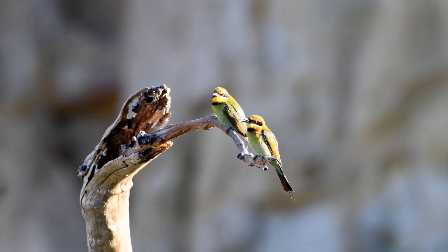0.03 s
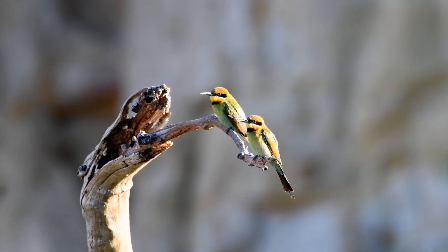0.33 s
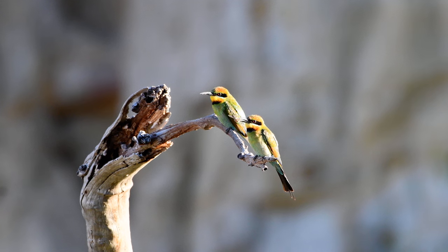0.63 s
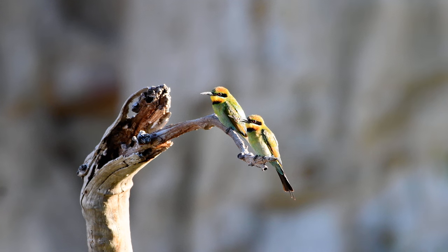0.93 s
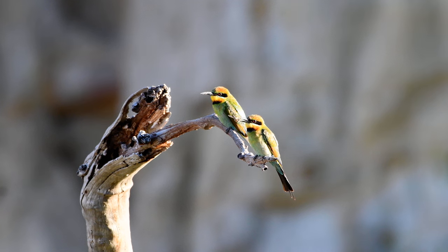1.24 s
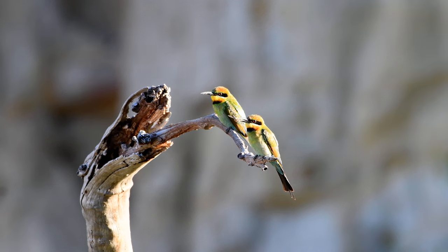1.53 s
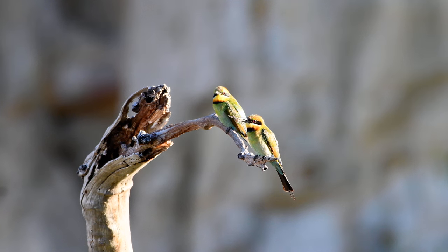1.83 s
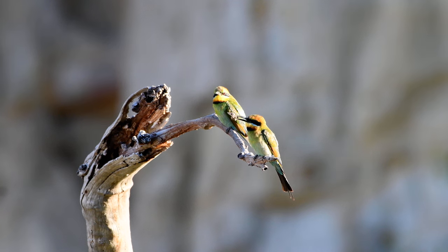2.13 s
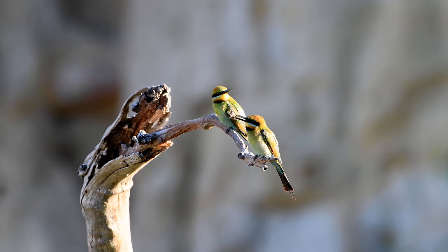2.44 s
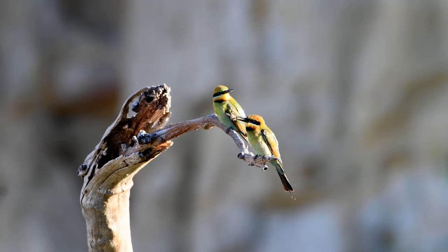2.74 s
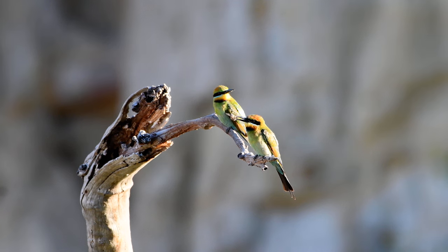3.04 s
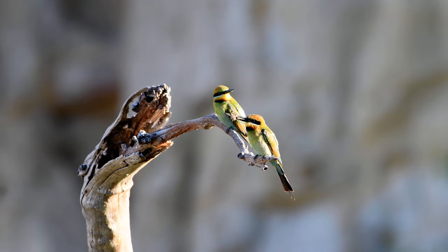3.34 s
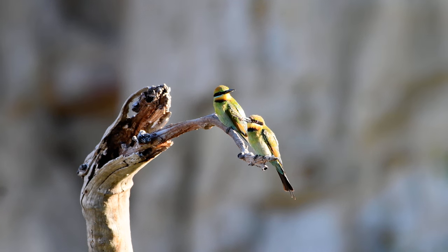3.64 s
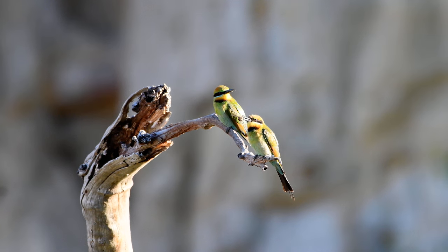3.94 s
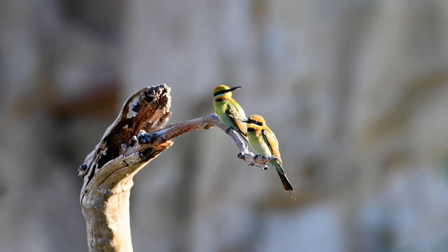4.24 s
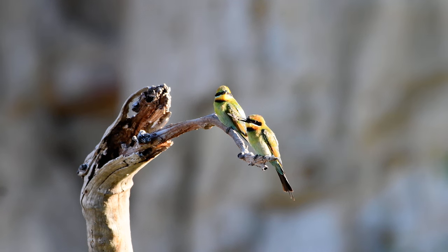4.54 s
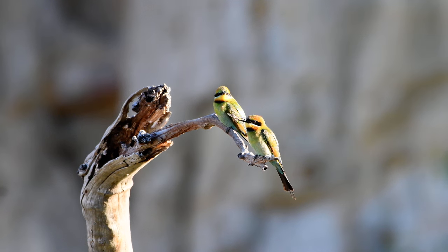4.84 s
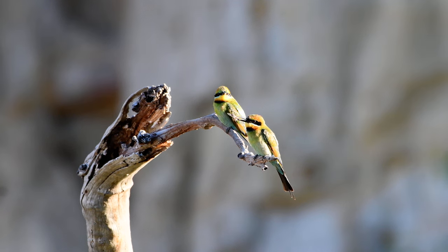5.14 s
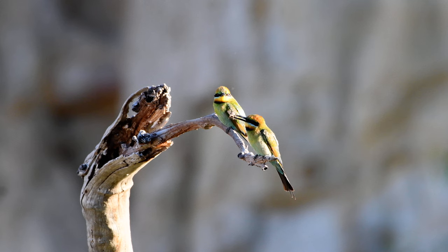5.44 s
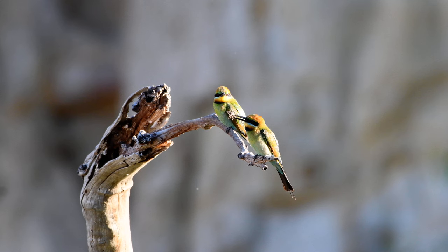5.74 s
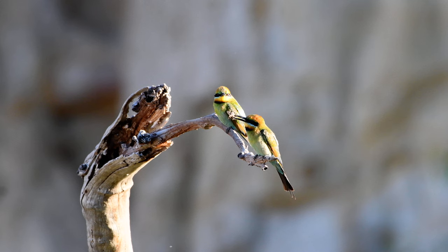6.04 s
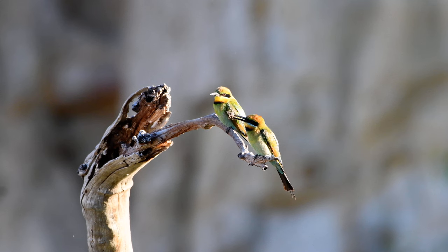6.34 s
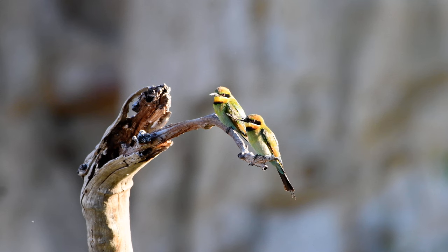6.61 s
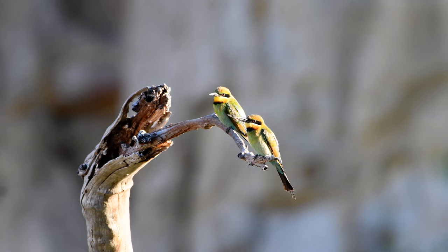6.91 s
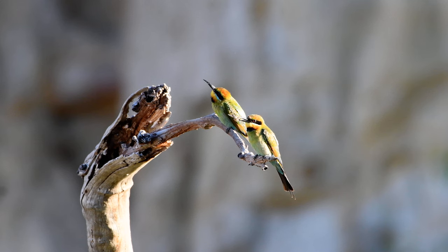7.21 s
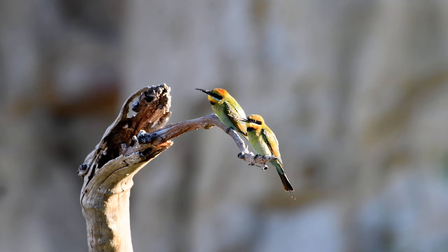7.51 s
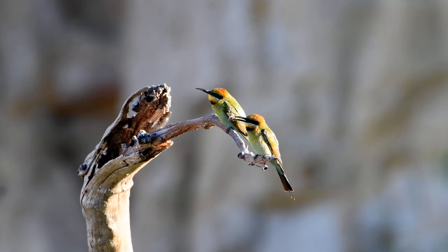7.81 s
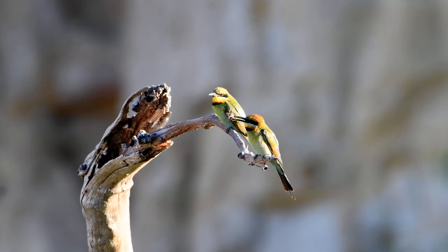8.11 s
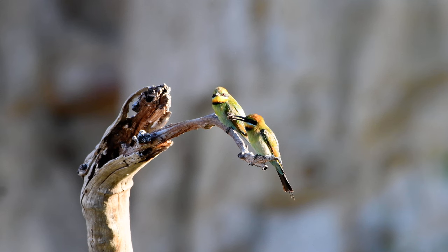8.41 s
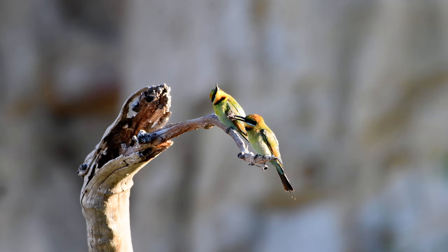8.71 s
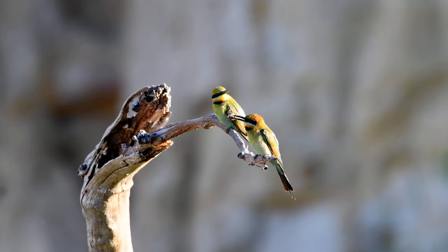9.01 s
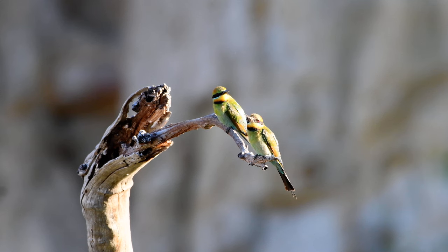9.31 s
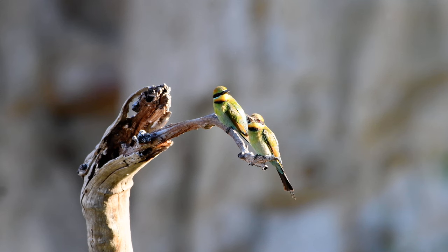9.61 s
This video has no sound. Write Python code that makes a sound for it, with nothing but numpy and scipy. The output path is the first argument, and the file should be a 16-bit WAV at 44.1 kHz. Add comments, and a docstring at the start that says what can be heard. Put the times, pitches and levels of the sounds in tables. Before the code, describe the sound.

Faint insect hiss and a low distant rumble run throughout this lightly echoing outdoor scene. From 0.2 to 2.4 seconds, a close songbird slightly to the right sings a dense run of very high chitters and swooping notes. A bird on the left gives short, buzzy falling calls at about 0.2, 2.2, 3.2, 3.6, 4.3, 4.6, 5.1, 6.8, 7.8 and 8.8 seconds. One soft, damped knock sounds nearby at 1.7 seconds. Quiet runs of pips come near 0.6 and 3.8 seconds. Distant hoarse caws sound on the right around 1 and 4 seconds, and more faintly near 7.5 and 9. Thin, high trills appear on the right near 2.7, 4.9, 7.2 and 8.4 seconds. Soft low warbles, far whistles and scratchy calls are scattered between. Crisp chips come around 2 and 7 seconds, then cluster from 8.7 to 9.5.

```python
"""Birds in a rocky gully

A near songbird on the right opens with chitters, dives and arches; a buzzy caller on the left repeats a
falling call. Chips, pips, whistles, trills, warbles, scratchy calls and caws come from other birds.
Each voice is a vibrating syrinx membrane, a tone modulated in pitch and level, echoed by trees and rock.
Insects hiss steadily over a low distant rumble, and one soft, damped knock sounds close by."""
import sys
import numpy as np
from scipy import signal
from scipy.fft import rfft, irfft, next_fast_len
from scipy.io import wavfile

SR = 44100
rng = np.random.default_rng(int(sys.argv[2]) if len(sys.argv) > 2 else 0)


def to_wav(s):
    """Save 16-bit WAV."""
    ch = np.atleast_2d(s).T  # columns
    pcm = np.round(np.clip(ch, -1, 1) * 32767)  # PCM
    wavfile.write(sys.argv[1], SR, pcm.astype(np.int16))


N = 430416
T = np.arange(N) / SR
EARS = np.array([[1], [-1]])  # left, right


def undb(db):
    """Amplitude ratio of a level in decibels."""
    return 10 ** (np.asarray(db) / 20)


def unit(x):
    """Normalisation to an rms of 1."""
    return x / np.sqrt(np.mean(x ** 2) + 1e-20)


def add(track, start, x):
    """Superposition: a sound joins a track at a time in seconds."""
    i = max(int(start * SR), 0)
    track[i:i + len(x)] += x[:max(N - i, 0)]


def wander(n, rate):
    """Random modulation: lines join `rate` Gaussian values a second, with a spread near 1."""
    at = np.arange(n) * rate / SR
    points = rng.standard_normal(int(at[-1]) + 2)
    return np.sqrt(3 / 2) * np.interp(at, np.arange(len(points)), points)


def colour(x, points):
    """Zero-phase filtering by a curve of (frequency_hz, gain_db) points."""
    hz, db = np.transpose(points)
    size = next_fast_len(N)
    f = np.maximum(np.fft.rfftfreq(size, 1 / SR), 1)
    return irfft(rfft(x, size) * undb(np.interp(np.log(f), np.log(hz), db)), size)[..., :N]


def course(length):
    """Normalised time, 0 to 1 through a note."""
    return np.linspace(0, 1, int(max(length, .004) * SR))


def arch(length, first, middle, last):
    """A parabolic contour through three pitches."""
    return np.polyval(np.polyfit([0, .5, 1], [first, middle, last], 2), course(length))


def syrinx(hz, edge, rough, harmonics_db=(0,)):
    """Frequency modulation: membrane flutter roughens a tone, tapered over the share `edge` of it."""
    flutter = 1 + rough * wander(len(hz), 900)
    phase = 2 * np.pi * np.cumsum(hz * flutter) / SR
    tone = sum(undb(db) * np.sin(k * phase) * (k * hz < SR / 2) for k, db in enumerate(harmonics_db, 1))
    return np.sqrt(2) * tone * signal.windows.tukey(len(hz), np.clip(edge, 0, 1))


def place(x, pan_db, lag_ms, scatter_db, scatter_t60, tail_db, tail_t60=1.9, off_axis_db=0):
    """Multipath propagation: direct sound, quick scatter from branches and reverberation from rock."""
    t, size = T[:SR], next_fast_len(N)
    scatter = undb(-60 * t / scatter_t60) * (t > .002) * rng.standard_normal((2, SR))
    tail = undb(-60 * t / tail_t60) * (1 - np.exp(-t / .015)) * rng.standard_normal((2, SR))
    echoes = (undb(scatter_db) * unit(scatter) + undb(tail_db) * unit(tail)) / np.sqrt(SR)
    gain = unit(undb(EARS * pan_db / 2))  # positive pan and lag put the bird on the left
    lead = np.exp(1j * np.pi * EARS * np.fft.rfftfreq(size, 1 / SR) * lag_ms / 1000)
    # the highest notes are beamed, so off the beak's axis they arrive mostly as echo
    beamed = colour(x, [(7200, .0057), (9500, off_axis_db)])
    direct = irfft(rfft(beamed, size) * lead, size)[:, :N]
    return gain * direct + np.sqrt(gain) * signal.fftconvolve(x[None], echoes, axes=1)[:, :N]


def diffuse_noise(spectrum):
    """Interaural coherence: noise is alike at both ears in the bass, largely unrelated in the treble."""
    # stereo width: frequency_hz, side_minus_mid_db
    width = [(40, -11), (90, -51), (180, -47), (350, -18.5), (700, -7.5), (1400, 0), (4000, 3.5),
             (6000, -2), (12000, 0.5)]
    hz, side_db = np.transpose(width)
    mid_db = -10 * np.log10(1 + undb(side_db) ** 2)
    mid, side = rng.standard_normal((2, N))
    mid = colour(mid, np.c_[hz, mid_db])
    side = colour(side, np.c_[hz, mid_db + side_db])
    both = colour(np.array([mid + side, mid - side]), spectrum)
    return both / np.std(both.mean(axis=0))


def insects(level_db=-51, pan_db=2, flicker_db=1.62):
    """Amplitude modulation: four bands of insect hiss flicker independently, a little to the left."""
    # hiss spectrum: frequency_hz, relative_density_db
    spectrum = [(1760, -28), (3000, -18), (3260, -10.5), (3750, -6), (4400, -0.5), (4750, 0), (5810, 1),
                (6310, 1), (6760, -1.5), (7880, -10), (9310, -19.5), (15000, -23.5), (15800, -27)]
    hiss = undb(level_db) * diffuse_noise(spectrum)
    for band_hz in ((3800, 5000), (5000, 6000), (6000, 7000), (7000, 8500)):
        band = signal.sosfiltfilt(signal.butter(2, band_hz, "band", fs=SR, output="sos"), hiss)
        drift_db = .6 * wander(N, 3)
        gain_db = flicker_db * wander(N, 22) + drift_db + EARS * pan_db / 2
        hiss = hiss + (undb(gain_db) - 1) * band
    return hiss


def distant_rumble(level_db=-58.5, drone_hz=94, drone_db=-67):
    """A tone in noise: a low drone wavers in pitch and level within a gently swelling rumble."""
    # rumble spectrum: frequency_hz, relative_density_db
    spectrum = [(13, -62), (22, -40), (51, -8), (93, -4), (107, -3.5), (124, -6.5), (216, -7.5),
                (339, -15.5), (462, -14), (522, -15.5), (567, -16.5), (1240, -16.5), (1830, -17),
                (2200, -18.5), (3000, -17), (3900, -49), (6600, -120)]
    rumble = undb(level_db + .4 * wander(N, 2)) * diffuse_noise(spectrum)
    drone_gain = undb(drone_db + 3.1 * wander(N, 9))
    phase = 2 * np.pi * np.cumsum(drone_hz + 6 * wander(N, 20)) / SR
    return rumble + drone_gain * np.sqrt(2) * np.sin(phase)


def far_chorus(count=45, level_db=-68):
    """A random point process: faint chirps from far down the gully, spread over an octave."""
    out = np.zeros(N)
    for when, duration, octave, bend, slope, loud in rng.random((count, 6)):
        tilt = slope - .3
        contour = arch(.0203 + .0345 * duration, 1 + .285 * tilt, 1 + .142 * (bend - .5), 1 - .24 * tilt)
        chirp = syrinx(2200 * 2 ** octave * contour, edge=.54, rough=.0092)
        add(out, when * N / SR, undb(level_db + 3.8 * (loud + octave - .5)) * chirp)
    return place(out, pan_db=-10, lag_ms=0, scatter_db=-3, scatter_t60=.15, tail_db=-17)


def knock(start_s=1.6825, pulse_hz=410, ring_hz=290, rise_s=.0036, ring_t60=.096, level_db=-33):
    """Damped vibration: a soft pulse and a brief ring, the same in both ears."""
    out, t = np.zeros(N), T[:SR // 10]
    swell = (t / rise_s * np.exp(1 - t / rise_s)) ** 3
    pulse = swell * np.cos(2 * np.pi * pulse_hz * (t - rise_s))
    decay = .21 * undb(-60 * t / ring_t60) * (1 - np.exp(-t / rise_s))
    add(out, start_s, undb(level_db) * (pulse + decay * np.sin(2 * np.pi * ring_hz * t)))
    return out


def cawer():
    """A harmonic series, strongest on its second partial, made hoarse by deep pitch jitter."""
    # distant caws: start_s, length_s, from_hz, to_hz, roughness_share, level_db
    caws = [(.83, .25, 1110, 965, 0.082, -50), (1.02, 0.19, 1080, 1300, .16, -49.5),
            (1.488, .4, 1077, 1140, 0.19, -55), (3.809, .58, 1400, 1052, 0.076, -51.5),
            (7.545, .15, 1385, 1055, .13, -64), (8.927, 0.6, 1172, 1094, .1, -63)]
    out = np.zeros(N)
    for start, length, first, last, rough, db in caws:
        path = first + (last - first) * course(length)
        gain = undb(db + 2 * wander(len(path), 60))
        add(out, start, gain * syrinx(path, edge=.45, rough=rough, harmonics_db=[-11, .5, -10.5]))
    return place(out, pan_db=-9, lag_ms=-.2, scatter_db=-8.5, scatter_t60=.14, tail_db=-12.5)


def triller(note_s=.042):
    """Pulse trains: runs of thin falling notes swell early and fade, blurred by scattering."""
    # high trills: start_s, length_s, notes_per_s, top_hz, fall_share, level_db
    trills = [(2.732, .37, 14.8, 8490, 0.088, -48.5), (4.886, 0.46, 16.4, 8660, 0.093, -54),
              (6.412, 0.09, 18, 8600, 0.16, -51), (7.244, 0.27, 18, 8620, 0.176, -47),
              (8.357, 0.31, 16, 8700, 0.11, -55)]
    out = np.zeros(N)
    for start, length, rate, top, fall, db in trills:
        path = top * (1 - fall * course(note_s))
        for after in np.arange(0, length - .02, 1 / rate):
            swell_db = -20 * abs(after / length - .3)
            add(out, start + after, undb(db + swell_db) * syrinx(path, edge=.8, rough=.016))
    return place(out, pan_db=-12, lag_ms=-.17, scatter_db=2, scatter_t60=.22, tail_db=-5, tail_t60=.7)


def warbler():
    """Transposition: a soft four-note phrase returns at varying pitch and speed."""
    # low phrases: start_s, spacing_ratio, pitch_ratio, level_db
    phrases = [(2.212, 0.35, 1.01, -58), (2.672, 1.3, 1.03, -57.5), (3.386, 0.96, .97, -58.5),
               (4.548, .95, 1, -57.5), (5.243, 0.98, 0.95, -59), (5.900, 1.06, 0.98, -59),
               (6.757, 0.77, .96, -62.5), (7.817, 1.13, .98, -59.5), (8.375, 1.24, 1.01, -58)]
    # notes of a phrase: offset_s, length_s, from_hz, middle_hz, to_hz, relative_db
    notes = [(0, 0.025, 1650, 1968, 1810, 1.5), (0.042, 0.026, 1836, 1788, 1570, -4),
             (0.078, 0.0193, 1700, 1677, 1560, -4), (0.104, .046, 1588, 1840, 1590, -2)]
    out = np.zeros(N)
    for start, stretch, ratio, db in phrases:
        for after, length, first, middle, last, note_db in notes:
            path = ratio * arch(length, first, middle, last)
            path *= 1 + .018 * wander(len(path), 70)
            add(out, start + stretch * after, undb(db + note_db) * syrinx(path, edge=.36, rough=.008))
    return place(out, pan_db=-3.5, lag_ms=-.02, scatter_db=-11, scatter_t60=.15, tail_db=-20)


def scratcher():
    """Pitch jitter: an uneven voice turns a far bird's brief glides scratchy."""
    # hoarse calls: start_s, length_s, from_hz, to_hz, level_db
    calls = [(4.935, .06, 2540, 3400, -61), (5.014, .075, 3500, 2700, -65), (5.57, 0.14, 3200, 2790, -68),
             (6.72, .05, 2920, 3150, -61), (7.528, 0.14, 3940, 3410, -66), (8.958, 0.066, 2650, 3400, -58)]
    out = np.zeros(N)
    for start, length, first, last, db in calls:
        path = first + (last - first) * course(length)
        path *= 1 + .07 * wander(len(path), 110)
        add(out, start, undb(db) * syrinx(path, edge=.5, rough=.038))
    return place(out, pan_db=2, lag_ms=0, scatter_db=0, scatter_t60=.15, tail_db=-10)


def whistlers(bow=.199, low_start_s=4.75, low_length_s=.63, low_hz=1295, low_db=-63.5):
    """Nearly pure tones: far whistles glide along bowed paths, and one long low note sinks and fades."""
    # gliding whistles: start_s, length_s, from_hz, to_hz, level_db
    whistles = [(0.046, .036, 6500, 6200, -49), (1.406, 0.069, 5620, 5690, -45.5),
                (1.65, 0.081, 3280, 3920, -54.5), (1.884, .038, 2010, 3320, -59),
                (1.921, 0.048, 3570, 2515, -53.5), (3.317, .05, 1960, 2110, -62),
                (3.544, .024, 1710, 2570, -61), (4.151, .09, 1277, 1280, -67),
                (6.257, .028, 3100, 2880, -59), (6.42, 0.045, 2660, 2160, -65),
                (6.69, .057, 3810, 3380, -57), (6.94, .04, 2750, 2440, -60),
                (7.075, 0.034, 3300, 2460, -56.5), (7.118, 0.022, 3400, 3430, -56),
                (7.127, .06, 2900, 2260, -60), (8.066, 0.044, 6600, 6300, -51),
                (8.187, 0.1, 2800, 2610, -64)]
    out = np.zeros(N)
    for start, length, first, last, db in whistles:
        middle = (first + last) / 2 + bow * abs(last - first)
        path = arch(length, first, middle, last)
        path *= 1 + .008 * wander(len(path), 80)
        add(out, start, undb(db) * syrinx(path, edge=.24, rough=.01))
    t = low_length_s * course(low_length_s)
    add(out, low_start_s, undb(low_db - 16 * t) * syrinx(low_hz - 190 * t, edge=.15, rough=.04))
    return place(out, pan_db=-1.5, lag_ms=-.03, scatter_db=-8, scatter_t60=.13, tail_db=-9)


def pips(note_s=.036, from_hz=3700, to_hz=2673, ground_s=.011, ground_db=-7):
    """Ground reflection doubles each falling pip, in runs that grow louder and higher."""
    # runs of pips: start_s, length_s, interval_s, level_db
    runs = [(0.215, .04, .078, -59.5), (0.571, .36, .078, -53.5), (3.763, .43, .0767, -53)]
    out = np.zeros(N)
    path = to_hz + (from_hz - to_hz) * (1 - course(note_s)) ** 1.414
    for start, length, gap, db in runs:
        for after in np.arange(0, length, gap):
            ratio = 1 + .146 * after + .0177 * wander(len(path), 58)
            gain = undb(db - 1 + 11 * after)
            note = gain * syrinx(path * ratio, edge=.55, rough=.02, harmonics_db=[0, -24])
            add(out, start + after, note)
            add(out, start + after + ground_s, undb(ground_db) * note)
    return place(out, pan_db=1, lag_ms=-.01, scatter_db=-1, scatter_t60=.19, tail_db=-4)


def chips(note_s=.029, from_hz=4500, to_hz=2943):
    """Frequency sweeps: single steep down-strokes, crisp because direct sound dominates."""
    # sharp chips: start_s, level_db
    strokes = [(1.9, -48), (2.349, -46.5), (2.474, -51), (6.9, -51), (7.044, -55), (8.659, -49),
               (8.847, -49.5), (9.253, -49.5), (9.354, -47), (9.457, -51)]
    out = np.zeros(N)
    path = to_hz + (from_hz - to_hz) * (1 - course(note_s)) ** 1.25
    for start, db in strokes:
        add(out, start, undb(db) * syrinx(path, edge=.46, rough=.011, harmonics_db=[0, -24]))
    return place(out, pan_db=2, lag_ms=.07, scatter_db=-8, scatter_t60=.12, tail_db=-12)


def buzzy_caller(vibrato_hz=330, step_s=.033, rasp_hz=4550, rasp_db=-6, throb_hz=160, throb_db=3):
    """Sidebands: fast vibrato makes slurred calls buzz; amplitude modulation makes stepped ones throb."""
    # slurred calls: start_s, length_s, level_db
    slurs = [(0.235, .13, -36), (2.202, .13, -35.5), (3.23, .12, -36.5), (4.28, .127, -36),
             (4.618, .13, -37.5), (6.789, .12, -37), (8.819, .13, -40)]
    # contour of a slur: length_share, pitch_hz, relative_db
    contour = [(0, 5650, -8), (.15, 5246, -2.5), (0.3, 4686, -3.5), (0.43, 4150, -1), (0.53, 4140, -4.5),
               (.68, 4475, 0.5), (0.839, 4212, -4), (1, 3510, -14)]
    # calls in four falling steps: start_s, interval_s, level_db, change_per_step_db
    stepped_calls = [(3.642, 0.037, -37, -0.5), (5.116, 0.038, -37.5, 1), (7.806, .037, -39.5, 0)]
    # notes of a stepped call: pitch_hz, roughness_share, relative_db
    steps = [(5594, 0.004, -2), (5160, 0.0094, -3.5), (4390, 0.0326, -4.5), (4220, .035, -3)]
    out = np.zeros(N)
    share, hz, effort_db = np.transpose(contour)
    for start, length, db in slurs:
        u = course(length)
        vibrato_rate = vibrato_hz * (1 + .152 * wander(len(u), 98.5))
        vibrato = .058 * np.sin(2 * np.pi * np.cumsum(vibrato_rate) / SR)
        path = np.interp(u, share, hz) * (1 + vibrato)
        gain = undb(db + np.interp(u, share, effort_db) + 2.5 * wander(len(u), 189.4))
        add(out, start, gain * syrinx(path, edge=.069, rough=.0235, harmonics_db=[0, -29]))
    flat = np.ones_like(course(step_s))
    for start, gap, db, change_db in stepped_calls:
        for k, (step_hz, rough, step_db) in enumerate(steps):
            tone = syrinx(step_hz * flat, edge=.22, rough=rough, harmonics_db=[0, -26])
            # the second side of the syrinx adds a rasp
            rasp = syrinx(rasp_hz * flat, edge=.27, rough=.116, harmonics_db=[0, -20])
            throb_rate = throb_hz * (1 + .17 * wander(len(flat), 117))
            throb = throb_db * np.sin(2 * np.pi * np.cumsum(throb_rate) / SR)
            gain = undb(db + step_db + k * change_db + throb)
            add(out, start + k * gap, gain * (tone + undb(rasp_db) * rasp))
    # turbulent air, pulsed by the voice, sprays into the treble
    air = unit(colour(rng.standard_normal(N), [(100, 0), (3500, -5), (8000, -12), (12000, -30)]))
    out *= 1 + undb(-21) * air
    out = colour(out, [(1500, -40), (3300, 0)])  # the caller's sound is cut below about 3 kHz and nearly silent under 1.5 kHz
    return place(out, pan_db=7, lag_ms=.12, scatter_db=-7.5, scatter_t60=.11, tail_db=-9, tail_t60=1)


def clear_note(length, pitch, shape, db):
    """A nearly pure glide; `shape` gives its start, middle and end as multiples of the pitch."""
    path = pitch * arch(length, *shape)
    gain = undb(db + 1.9 * wander(len(path), 203))
    return gain * syrinx(path, edge=.48, rough=.0076, harmonics_db=[0, -50])


def songbird(dive_s=.023, arch_s=.0247, climb_hz_per_s=9000, top_fade_db=-10):
    """Wide frequency modulation: dives, arches and chitters whose swings are loudest at the bottom."""
    # hooked notes, a dive then an arch: start_s, pitch_hz, arch_delay_s, dive_db, arch_db
    hooks = [(.583, 6520, 0.016, -36, -37), (.848, 6760, 0.019, -35.5, -35),
             (1.105, 7000, 0.019, -33.5, -35), (1.323, 5790, 0.031, -34.5, -29.5),
             (1.511, 5480, .033, -34, -29), (1.697, 5360, .029, -34.5, -33), (1.879, 5300, .028, -34, -32),
             (2.058, 5080, .028, -37.5, -36), (2.291, 5820, 0.021, -40, -28.5)]
    # plain arched notes: start_s, length_s, pitch_hz, level_db
    arches = [(.389, .028, 5900, -40.5), (0.675, 0.026, 6120, -31.5), (.854, 0.014, 8130, -29),
              (0.932, 0.027, 6140, -30.5), (1.185, .028, 5960, -32.5), (2.292, 0.013, 6490, -31.5)]
    # zigzag chitters: start_s, length_s, swings_per_s, level_db
    chitters = [(0.161, 0.073, 74, -39.5), (0.476, 0.073, 58, -36), (0.741, 0.07, 51, -32),
                (1.004, 0.055, 68, -32), (1.252, 0.046, 56, -30.5), (1.458, 0.033, 58, -30.5),
                (1.646, 0.035, 54, -31), (1.823, .037, 53, -30.5), (2.009, 0.032, 58, -30.5),
                (2.188, 0.042, 69, -33), (2.352, 0.031, 88, -35)]
    # top of the swings over the song: time_s, pitch_hz
    ceiling = [(.16, 8660), (.8, 10200), (1.25, 9930), (1.5, 9040), (2.35, 7840)]
    out = np.zeros(N)
    for start, pitch, gap, dive_db, arch_db in hooks:
        add(out, start, clear_note(dive_s, pitch, (1.42, 1.02, .75), dive_db))
        add(out, start + gap, clear_note(arch_s, pitch, (.82, .99, .86), arch_db))
    for start, length, pitch, db in arches:
        add(out, start, clear_note(length, pitch, (.92, 1, .912), db))
    times, tops = np.transpose(ceiling)
    for start, length, rate, db in chitters:
        high_hz = np.interp(start, times, tops)
        low_hz = 5440 * (high_hz / tops.max()) ** .336  # the bottom partly follows the top
        t = length * course(length)
        swing = (rate * (t - length) + .58) % 1  # every chitter ends near the bottom of a swing
        height = (1 - np.sin(np.pi * swing ** 1.3)) ** .86  # slow fall, quick rise
        path = low_hz + climb_hz_per_s * t * (1 - height) + (high_hz - low_hz) * height
        gain = undb(db + top_fade_db * height)
        add(out, start, gain * syrinx(path, edge=.18, rough=.0237, harmonics_db=[0, -50]))
    return place(out, pan_db=-6, lag_ms=-.088, scatter_db=-9.5, scatter_t60=.12,
                 tail_db=-12, tail_t60=.95, off_axis_db=-16.5)


def scene():
    """Superposition of the birds, the knock and the background."""
    birds = songbird() + buzzy_caller() + pips() + chips()
    far_birds = whistlers() + scratcher() + warbler() + triller() + cawer() + far_chorus()
    return birds + far_birds + knock() + insects() + distant_rumble()


def record(dry, open_s=.034, cutoff_hz=15800):
    """Gating and band limiting: the sound opens after a moment, and a steep low-pass cuts the top."""
    gate = np.clip((T - open_s) / .003, 0, 1)
    return signal.sosfilt(signal.ellip(10, .1, 70, cutoff_hz, fs=SR, output="sos"), dry * gate)


dry = scene()
out = record(dry)
to_wav(out)
```